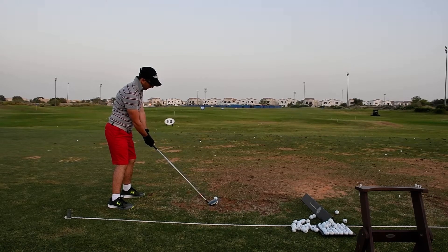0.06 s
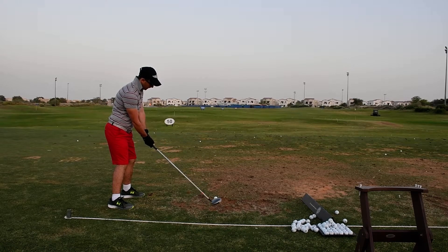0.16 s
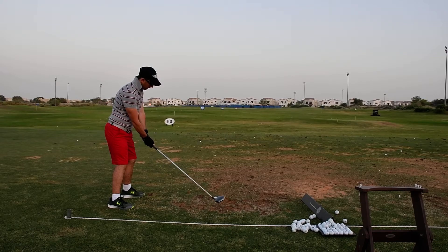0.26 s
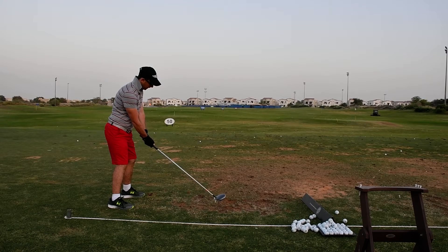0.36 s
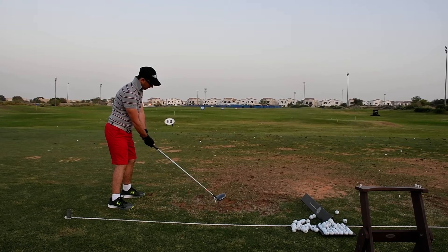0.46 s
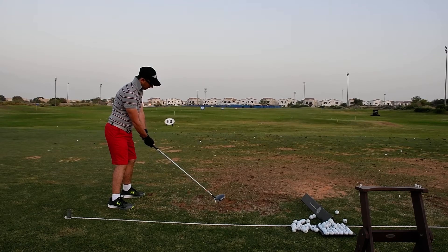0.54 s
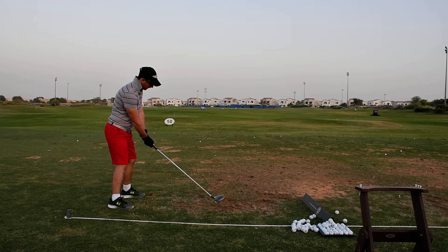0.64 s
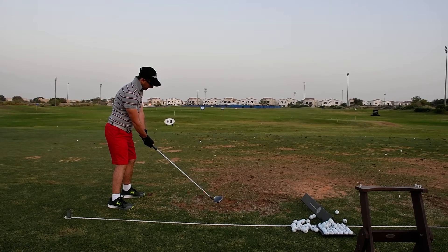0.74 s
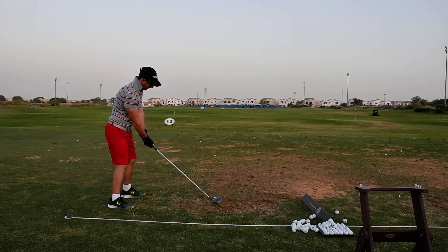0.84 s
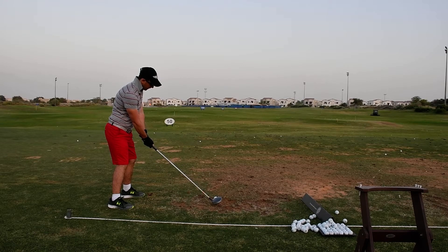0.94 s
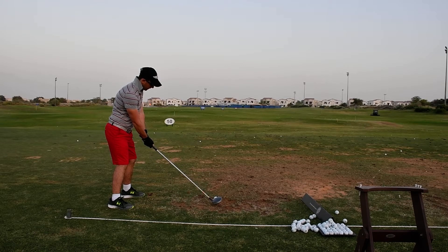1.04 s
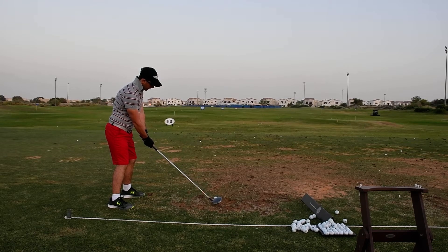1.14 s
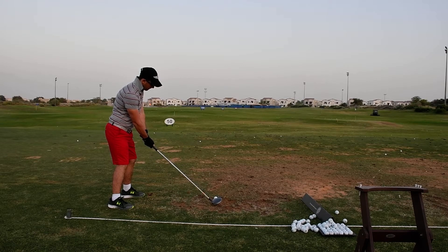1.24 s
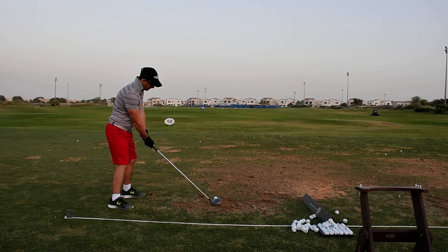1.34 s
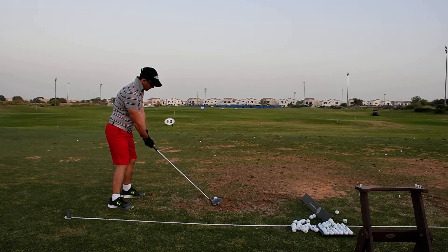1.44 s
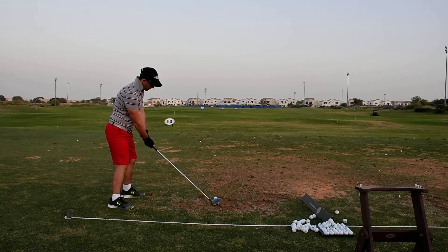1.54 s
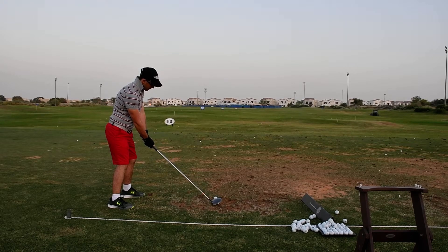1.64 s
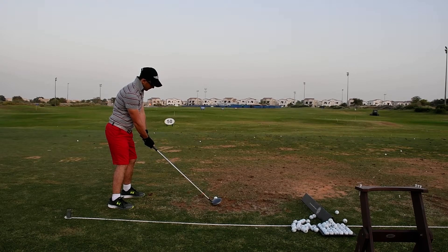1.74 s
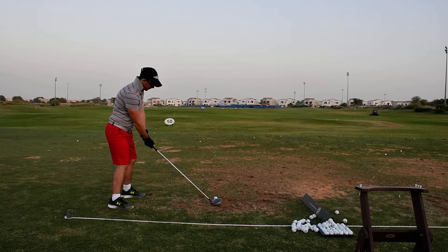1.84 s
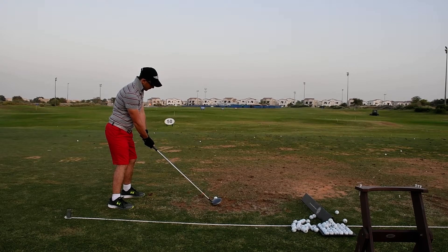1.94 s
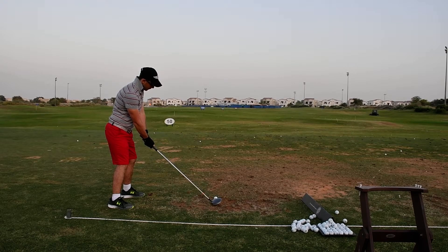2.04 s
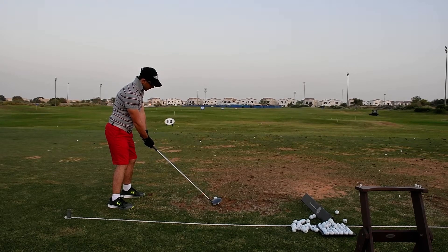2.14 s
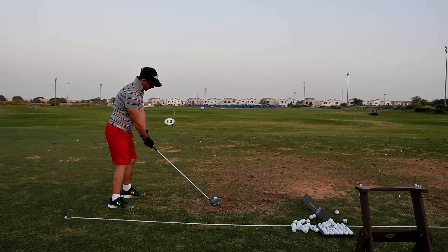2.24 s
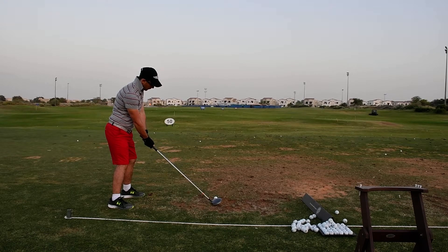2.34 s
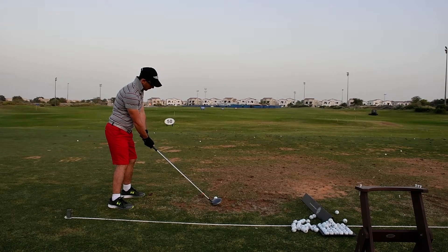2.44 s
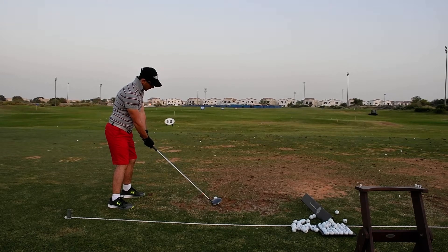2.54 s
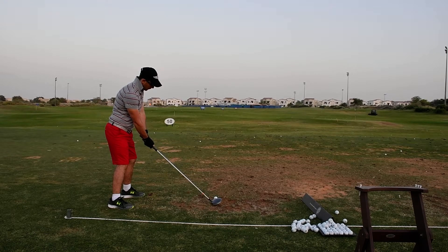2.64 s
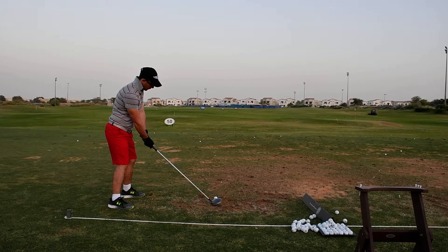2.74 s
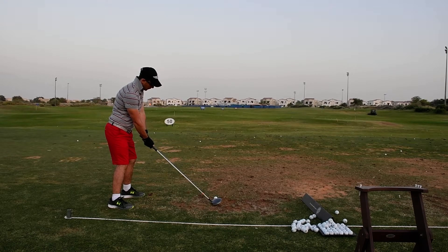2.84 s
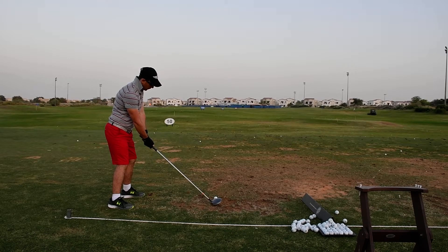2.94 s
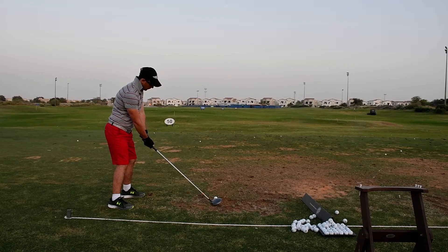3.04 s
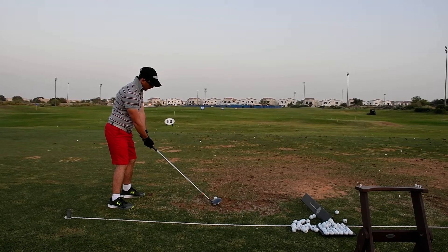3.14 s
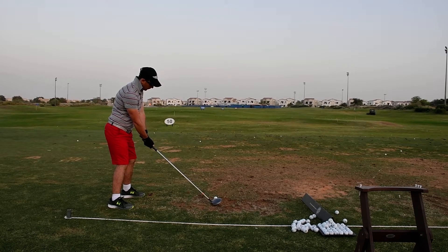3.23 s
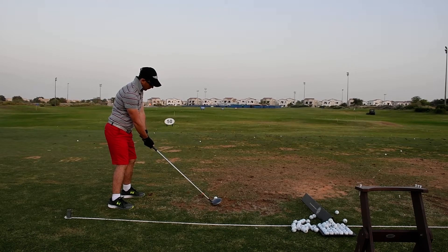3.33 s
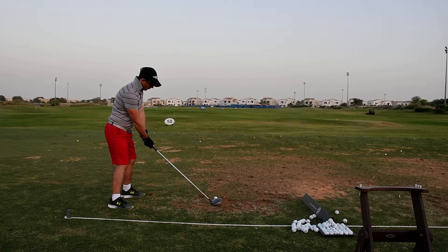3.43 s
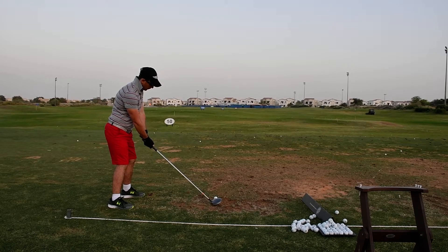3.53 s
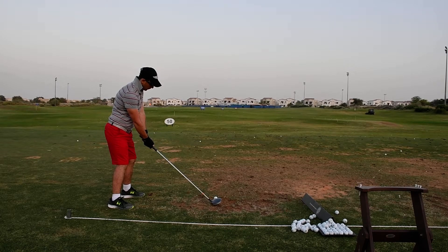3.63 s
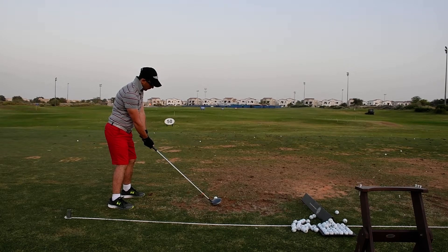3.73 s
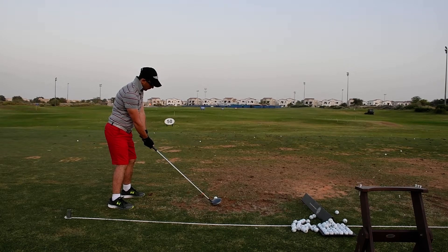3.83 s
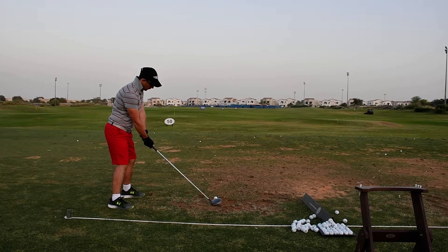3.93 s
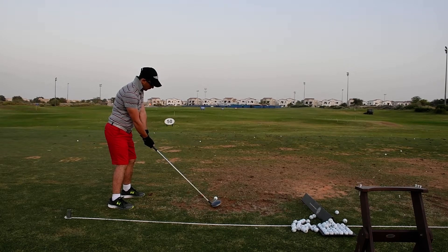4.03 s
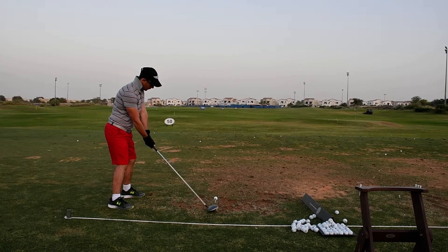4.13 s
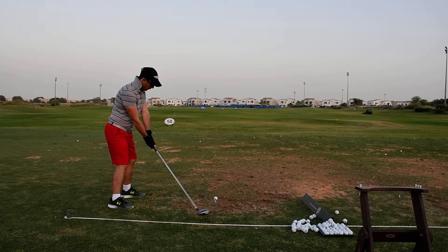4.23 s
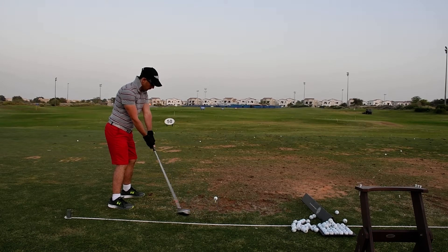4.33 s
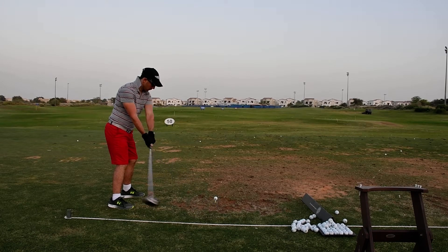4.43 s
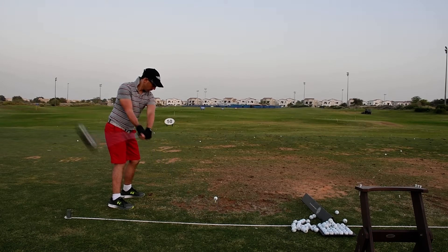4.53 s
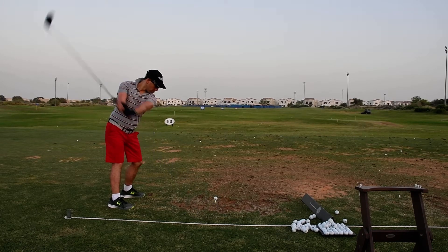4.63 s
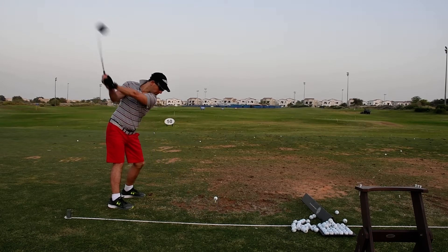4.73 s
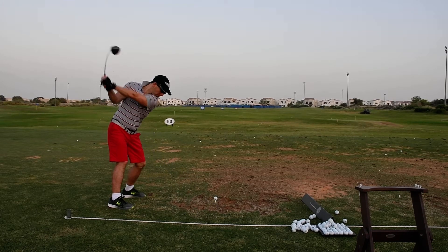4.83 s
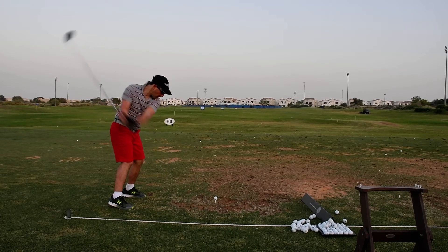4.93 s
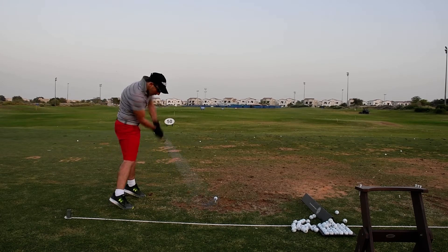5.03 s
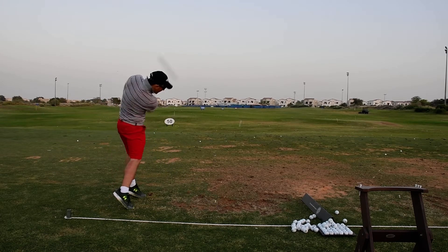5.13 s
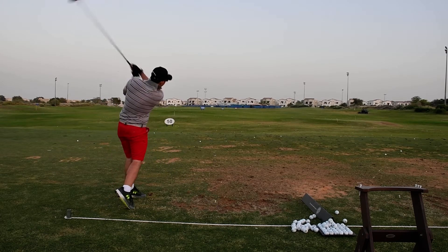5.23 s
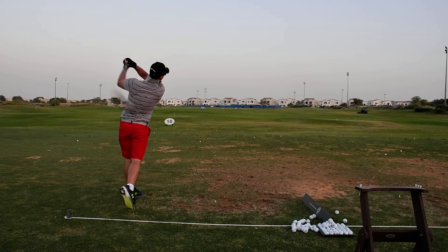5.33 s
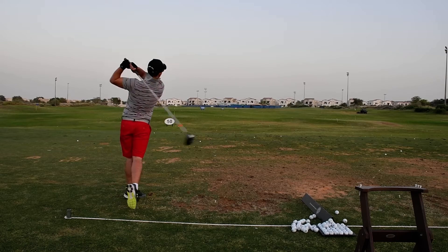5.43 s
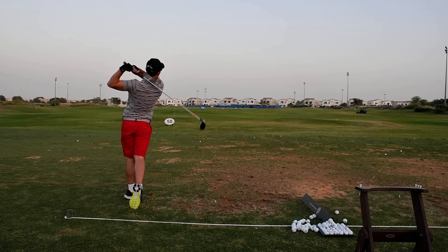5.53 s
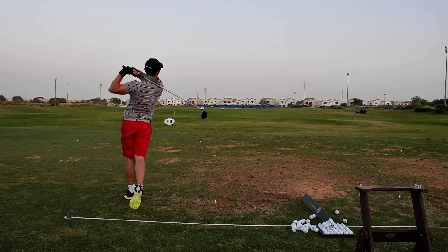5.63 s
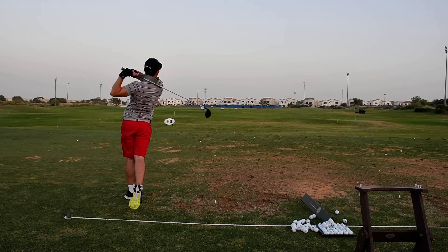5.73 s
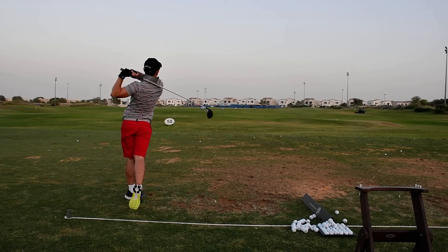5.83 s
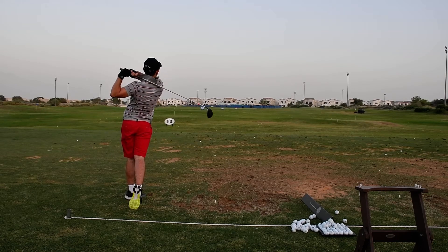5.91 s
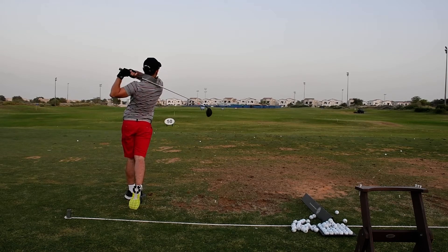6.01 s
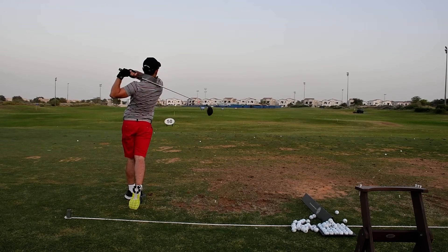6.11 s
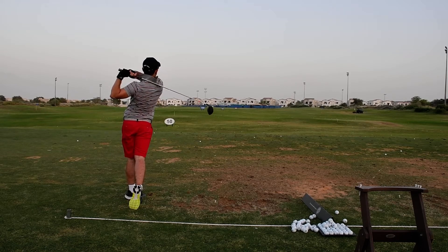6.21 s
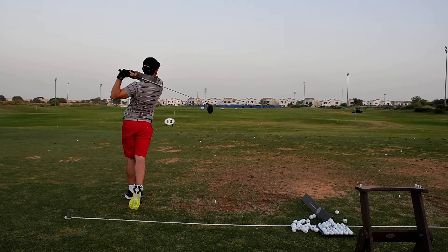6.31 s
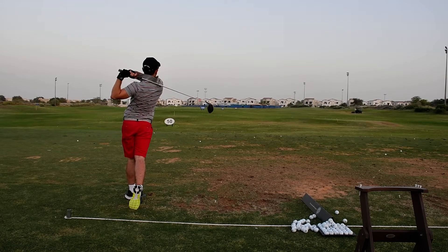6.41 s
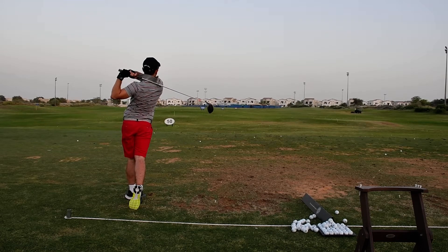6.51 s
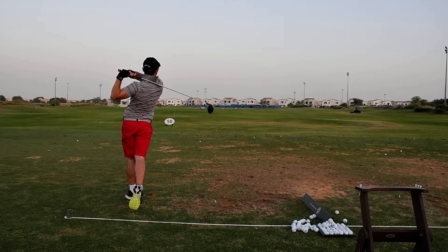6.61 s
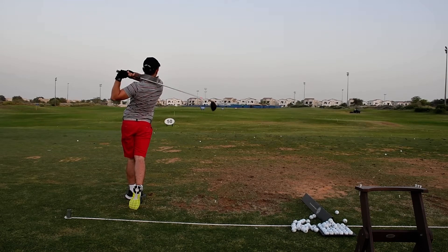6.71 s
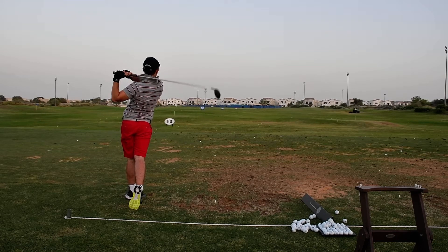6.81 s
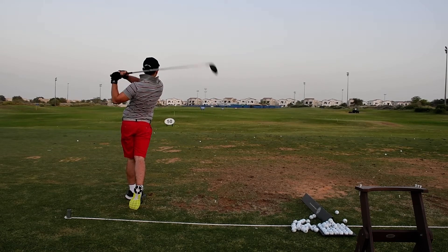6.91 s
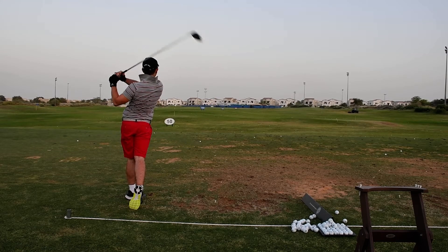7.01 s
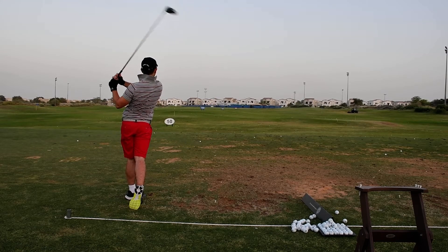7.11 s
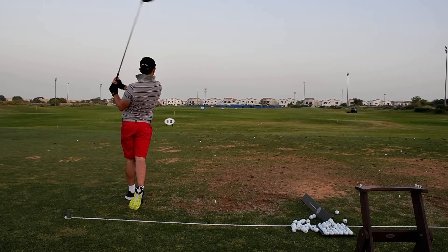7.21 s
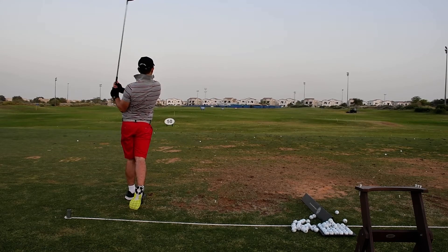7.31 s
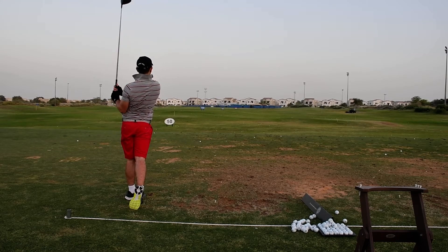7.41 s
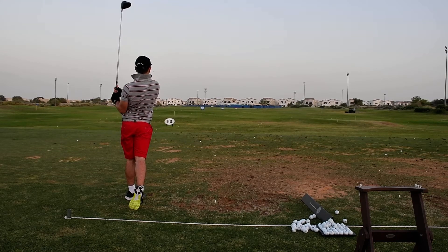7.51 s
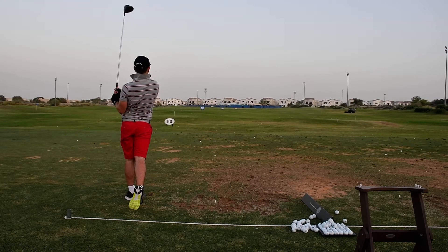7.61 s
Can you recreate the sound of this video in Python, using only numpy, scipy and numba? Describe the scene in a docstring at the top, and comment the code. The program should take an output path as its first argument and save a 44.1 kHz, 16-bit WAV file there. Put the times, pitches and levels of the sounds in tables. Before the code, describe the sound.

A golf driver cracks a ball with a loud, bright metallic ping on an open range, amid twittering birds, insect hiss and distant traffic.

```python
"""A golf drive on an open range.

The hollow club head is a sum of decaying modes that glide up by Doppler shift as it swings round;
a limiter and clipping flatten the crack. Two other shots to the right are knocks with ringing noise.
Birds are gliding tones, harmonics or narrow noise; insects are pulsing and steady bands of hiss.
Far traffic, open air and puffs of wind are shaped noise."""
import sys
import numpy as np
from scipy import signal
from scipy.fft import rfft, irfft
from scipy.io import wavfile
from numba import njit

SR = 44100
rng = np.random.default_rng(int(sys.argv[2]) if len(sys.argv) > 2 else 0)


def materialize(psi):
    """Save the field psi as 16-bit PCM at rate SR to the path in sys.argv[1].

    A 1-D psi becomes a single channel; in a 2-D psi each row is a channel.
    """
    bounded = np.clip(np.atleast_2d(psi).T, -1, 1)
    quanta = np.round(bounded * 32767).astype(np.int16)
    wavfile.write(sys.argv[1], SR, quanta)


N = 337806
T = np.arange(N) / SR  # time [s]
HZ = np.maximum(np.arange(N // 2 + 1) * SR / N, 1)  # frequency of each spectral bin [Hz]
SOUND_M_S = 343  # speed of sound [m/s]
IMPACT_S = 5.0415  # the club meets the ball [s]
TOP_HZ = 15700  # upper limit of the output band [Hz]

# Far traffic: (frequency [Hz], level density [dB per Hz])
TRAFFIC_SPECTRUM = [(20, -81), (40, -73.5), (65, -58), (105, -55.5), (170, -59), (260, -67), (400, -77),
                    (620, -71.5), (900, -66), (1300, -72.5), (2000, -82.5), (3200, -96), (8000, -112)]
# Open air, unrelated left and right: (frequency [Hz], level density [dB per Hz])
AIR_SPECTRUM = [(20, -78), (65, -64), (130, -64.5), (380, -85), (900, -74.5), (2000, -82), (3200, -84.5),
                (6200, -88.5), (7500, -100), (10000, -101), (12500, -103), (16000, -104)]
# Puffs of wind on the microphone: (time [s], half length [s], level [dB], top frequency [Hz])
WIND_PUFFS = [(0.029, 0.013, -27.5, 151), (0.102, 0.049, -28.5, 323), (0.192, 0.006, -27.5, 220),
              (.245, 0.019, -30, 151), (0.981, 0.017, -31.5, 352), (2.68, 0.043, -34, 171),
              (2.827, 0.048, -32.5, 154), (3.864, 0.046, -34, 169)]
# Swell of the insect chorus: (time [s], relative level [dB])
CHORUS_SWELL = [(0, -53.4), (0.5, -49), (1.1, -48.5), (1.45, -46.5), (2.15, -48.5), (2.55, -56),
                (2.85, -54.5), (3.2, -49.5), (3.75, -59), (4.35, -49.5), (4.78, -54), (5.55, -50.5),
                (5.95, -47), (6.27, -48), (6.65, -57.3), (7.1, -67), (7.66, -64)]
# Spectrum of the insect chorus: (frequency [Hz], relative level [dB])
CHORUS_SPECTRUM = [(2500, -45), (4500, -2), (6400, 3), (7300, -2), (8100, -2.5), (8800, -3.5), (9650, -4.5),
                   (10300, -9.5), (11500, -20), (14000, -31)]
# Lower insects without wing pulses: (time [s], level [dB])
DRONE_SWELL = [(0, -47.5), (.6, -53), (1.4, -62), (2.5, -50.5), (3.5, -55), (4.2, -50.5), (5.3, -48.5),
               (6.2, -45.5), (6.7, -68), (7.66, -61)]
# Mewing call of a far bird: (time [s], pitch [Hz], relative level [dB])
MEW_CONTOUR = [(.44, 440, -75), (.47, 465, -58), (.51, 530, -55), (.58, 600, -52), (.65, 643, -49),
               (.77, 681, -49), (.84, 630, -54), (.88, 600, -75)]
# Throat resonances of that call: (centre [Hz], width [Hz], relative level [dB])
THROAT_RESONANCES = [(1350, 300, 9), (2160, 370, 7.5), (2570, 200, -1), (4070, 460, -10)]
# Scolds of a hoarse bird: (time [s], length [s], centre [Hz], level [dB])
SCOLDS = [(4.39, 0.094, 2460, -39.5), (4.453, 0.078, 2320, -39.5), (4.553, .025, 2650, -43.5),
          (4.628, 0.093, 2330, -47.5), (4.767, 0.02, 2430, -46), (4.847, .05, 2350, -50)]
# Small bird's phrases, tumbling from a top pitch: (time [s], length [s], top pitch [Hz], relative level [dB])
BIRD_PHRASES = [(.42, .13, 5610, -47), (.633, .09, 4910, -49), (.82, .03, 4990, -51),
                (0.907, .04, 4550, -50), (1.011, .04, 4280, -53), (1.05, .13, 5670, -49),
                (1.53, .09, 5210, -48.5), (1.625, .04, 4390, -48), (1.72, .11, 4950, -47),
                (2.278, .04, 4300, -46), (2.324, .04, 4150, -47), (2.37, .03, 5000, -42),
                (2.44, .15, 5600, -48.5), (3.01, .08, 4870, -43), (3.1, .06, 5200, -44),
                (3.214, .04, 4480, -44.5), (3.738, .03, 5300, -49), (3.84, .09, 4900, -51.5),
                (4.047, .04, 3630, -49.5), (4.126, .06, 5120, -48.5), (4.28, .11, 5070, -45),
                (4.468, .03, 5050, -44), (4.595, .08, 4880, -46.5), (4.787, .04, 4900, -51),
                (4.873, .04, 4390, -48), (5.228, .11, 5600, -46.5), (5.325, .03, 5450, -48),
                (5.358, .04, 4450, -41.5), (5.552, .09, 4800, -48), (5.714, .1, 5080, -47.5),
                (5.9, .06, 5200, -49), (5.955, .1, 5000, -50), (6.165, .06, 4790, -48.5),
                (6.494, .11, 4900, -46), (6.657, .12, 5640, -44), (6.8, .03, 5020, -45),
                (6.866, .05, 3250, -48), (7.022, .05, 3750, -51), (7.336, .14, 5970, -47.5),
                (7.435, .09, 4970, -48)]
# Short low peeps between the phrases: (time [s], pitch [Hz], relative level [dB])
BIRD_PEEPS = [(1.34, 2665, -40.5), (1.826, 2520, -40), (2.848, 2900, -48), (6.13, 2510, -41),
              (6.325, 2730, -43), (7.535, 2540, -46)]
# Thin pips of another bird: (time [s], length [s], pitch [Hz], relative level [dB], final sag [Hz])
THIN_PIPS = [(3.293, .022, 5550, -48, 250), (3.515, .022, 5350, -46.5, 350),
             (3.625, .025, 5420, -43.5, 500), (4.68, .048, 6010, -45, 0), (4.959, .017, 5960, -45, 0),
             (5.387, 0.044, 5990, -39.5, 0)]
# Shots from other bays: (time [s], knock level [dB], knock frequency [Hz],
#                         ring level [dB], ring 60 dB decay time [s], tail level [dB])
BAY_SHOTS = [(2.2727, -5.5, 2150, -19, 0.027, -36), (4.4024, -14.5, 1900, -19, 0.039, -31)]
# Ring spectrum of those shots: (frequency [Hz], relative level [dB])
SHOT_SPECTRUM = [(1500, -12), (3000, -5), (5500, 4.5), (8000, 4.5), (11000, -2), (13000, -10), (16000, -20)]
# Main modes of the hollow club head: (frequency [Hz], relative level [dB], 60 dB decay time [s])
HEAD_MODES = [(1850, -25, .22), (2692, -18, .16), (2950, -10, .21), (3634, -9, .11), (4040, -13, .26),
              (4371, -14, .11), (5464, -3, .12), (5766, -2, .11), (5981, 5, .115), (6589, 4, .11),
              (6735, 0, .11), (7224, 0, .11), (7386, -5, .11), (7644, -7, .12), (7865, -5, .125),
              (8280, -6, .13), (8710, -9, .12), (8990, -9, .11), (9372, -12, .11), (9889, -11, .09),
              (11477, -16, .09)]
# Its dense weak overtones: (frequency [Hz], relative level of a mode [dB])
SHELL_SPECTRUM = [(2500, -19), (4500, -15), (6200, -6), (8000, -16), (10000, -9), (12500, -22),
                  (15500, -30)]
# Echoes off the range's fittings: (delay [s], relative level [dB], centre [Hz],
#                                   width of each of two resonances [Hz], left minus right [dB])
FITTING_ECHOES = [(0.019, -5.5, 2860, 900, 3), (0.029, -18, 6540, 2000, -6), (0.055, -29, 8800, 2500, -13),
                  (.083, -24.5, 8800, 1500, -12), (.099, -35, 9000, 1810, -10),
                  (0.107, -38, 6000, 700, -10)]

NOTE_S, NOTE_HZ = .034, 4505  # length of a note at the bird's easiest pitch; lower notes last longer
STEP_HZ = 789  # each note's top starts this far below the last
ARCH_HZ, ARCH_PER_HZ = 480, .6  # a note's ends lie this far below its top; higher notes arch more
SLUR_HZ = 130  # mean downward lean: the start is raised and the end lowered by this much
STRAIN_DB_PER_OCTAVE2 = 20  # notes weaken with the squared distance from the easiest pitch
PEEP_S, PEEP_SAG_HZ = .023, 220


def undb(db):
    """A level in decibels is twenty times the logarithm of the amplitude ratio returned here."""
    return 10 ** (np.asarray(db) / 20)


def unit(x):
    """Normalisation divides by the root mean square, leaving rms 1."""
    return x / np.sqrt(np.mean(x ** 2))


def colour(points, hz=HZ):
    """A spectrum is interpolated in decibels over log frequency and returned as gain."""
    point_hz, db = np.transpose(points)
    return undb(np.interp(np.log(hz), np.log(point_hz), db))


def resonance(centre_hz, width_hz, hz=HZ):
    """A damped oscillator passes a band around its natural frequency, with gain 1 at the centre."""
    return 1 / (1 + 1j * (hz ** 2 - centre_hz ** 2) / (hz * width_hz))


def shape(x, response):
    """Linear filtering is multiplication of spectra."""
    return irfft(rfft(x) * response, N)


def noise(response):
    """White noise is filtered to the given amplitude per root hertz."""
    return shape(rng.standard_normal(N), response) * np.sqrt(SR / 2)


def walk(rate):
    """Low-passed noise is a smooth random fluctuation: spread 1, up to about rate changes a second."""
    return unit(noise(1 / (1 + (HZ / rate) ** 4)))


def decay(age, t60):
    """Exponential damping loses 60 dB every t60 after silence before age 0."""
    return (age >= 0) * np.exp(-np.log(1000) * np.maximum(age, 0) / t60)


def place(x, lead_ms, pan_db):
    """Direction is a time and level difference: the left port leads by lead_ms and is pan_db louder."""
    late = np.exp(-2j * np.pi * HZ * lead_ms / 1000)
    left = x * undb(pan_db / 2)
    right = shape(x, late) * undb(-pan_db / 2)
    return np.array([left, right])


def scatter(x, wet_db, t60):
    """Diffuse reflection from turf and fittings is a decaying noise response, unrelated at each port."""
    tail = rng.standard_normal((2, N)) * decay(T - .003, t60)
    response = tail / np.sqrt(np.sum(tail ** 2) / 2)
    return undb(wet_db) * shape(x, rfft(response))


def haze():
    """Superposed broadband noise: fluctuating traffic with a faint engine drone, and steady open air."""
    traffic = noise(colour(TRAFFIC_SPECTRUM)) * undb(.5 * walk(2.0) + 0.75 * walk(7))
    engines = undb(-48.5) * unit(noise(resonance(104.65, 4.5) ** 2))
    air = np.array([noise(colour(AIR_SPECTRUM)) for _ in range(2)])
    return place(traffic + engines, lead_ms=0.21, pan_db=1) + air


def wind():
    """Wind pressure on the microphone is low-frequency noise in brief puffs, mostly on the left port."""
    puffs = np.zeros(N)
    for s, half_s, db, top_hz in WIND_PUFFS:
        swell = np.exp(-((T - s) / half_s) ** 2)
        puffs += undb(db) * swell * unit(noise(resonance(top_hz / 2, top_hz / 2) ** 3))
    return place(puffs, lead_ms=.2, pan_db=14.0)


def insects(chorus_db=-1.1, stroke_hz=20.5):
    """Amplitude modulation by wing strokes of three pulses roughens a high chorus over a lower band."""
    stroke = 2 * np.pi * np.cumsum(stroke_hz * (1 + 0.02 * walk(2.7))) / SR
    pulsing = 1 + .17 * np.cos(stroke) + .17 * np.cos(3 * stroke) + .08 * np.cos(4 * stroke)
    swell_db = np.interp(T, *np.transpose(CHORUS_SWELL)) + chorus_db + .5 * walk(30)
    chorus = pulsing * unit(noise(colour(CHORUS_SPECTRUM))) * undb(swell_db)
    drone_db = np.interp(T, *np.transpose(DRONE_SWELL))
    drone = unit(noise(resonance(6060, 1350) ** 2)) * undb(drone_db)
    direct = place(chorus, lead_ms=-0.093, pan_db=-10) + place(drone, lead_ms=-0.1, pan_db=-6.0)
    return direct + scatter(chorus + drone, wet_db=-18, t60=0.091)


def mewing_bird(count=7):
    """Source and filter: harmonics of a rising and falling pitch pass through fixed throat resonances."""
    s, pitch, db = np.transpose(MEW_CONTOUR)
    hz = np.interp(T, s, pitch) * (1 + 0.0035 * walk(57))
    phase = 2 * np.pi * np.cumsum(hz) / SR
    cry = np.zeros(N)
    for k in range(2, count):  # the fundamental is left out
        throat = sum(undb(gain_db) * np.abs(resonance(centre_hz, width_hz, k * hz)) ** 2
                     for centre_hz, width_hz, gain_db in THROAT_RESONANCES)
        cry += np.sin(k * phase) * throat
    cry = cry * np.interp(T, s, undb(db), left=0, right=0)
    return place(cry, lead_ms=-0.3, pan_db=10.5) + scatter(cry, wet_db=-6, t60=0.28)


def hoarse_bird():
    """Narrow-band noise in flat-topped bursts is heard as a rasping scold, far to the left."""
    scold = np.zeros(N)
    for s, length, hz, db in SCOLDS:
        burst = np.exp(-(2 * (T - s) / length - 1) ** 4)
        scold += undb(db) * burst * unit(noise(resonance(hz, 410) ** 3))
    return place(scold, lead_ms=0.11, pan_db=8.5) + scatter(scold, wet_db=-7, t60=0.43)


def whistles(notes, waver=0.013):
    """Frequency modulation: pure tones arch through three pitches with slight waver and flutter."""
    out = np.zeros(N)
    tremble = 1 + waver * walk(118)
    flutter = undb(2.6 * walk(117))
    for s, length, start_hz, middle_hz, end_hz, db in notes:
        i = np.flatnonzero(np.abs(T - s - length / 2) < .6 * length)
        u = (T[i] - s) / length
        arch = np.polyfit([0, .5, 1], [start_hz, middle_hz, end_hz], 2)
        hz = np.polyval(arch, u) * tremble[i]
        tone = np.sqrt(2) * np.sin(2 * np.pi * np.cumsum(hz) / SR)
        out[i] += undb(db) * signal.windows.tukey(len(i), .5) * flutter[i] * tone
    return out


def tumble(s, length, top_hz, db, skew_hz=110):
    """A phrase steps down in pitch; its arched notes grow longer and flatter until the time is used up."""
    notes, end = [], s + length
    for lean_hz in SLUR_HZ + skew_hz * rng.standard_normal(6):  # at most six notes
        note_s = NOTE_S * NOTE_HZ / top_hz
        if notes and s + note_s / 2 > end:
            break
        foot_hz = top_hz - max(ARCH_HZ + ARCH_PER_HZ * (top_hz - NOTE_HZ), 0)
        strain_db = STRAIN_DB_PER_OCTAVE2 * np.log2(top_hz / NOTE_HZ) ** 2
        notes.append((s, note_s, foot_hz + lean_hz, top_hz, foot_hz - lean_hz, db - strain_db))
        s, top_hz = s + note_s, top_hz - STEP_HZ
    return notes


def level_note(s, length, hz, db, sag_hz):
    """A note with equal first and middle pitch sags toward its end."""
    return s, length, hz, hz, hz - sag_hz, db


def flock(count=80, flock_db=-53.0, spread_db=3, low_hz=4500, high_hz=6000,
          early_s=.04, late_s=.1, length_s=.07):
    """Superposition of many weak voices: further birds join in around each phrase with short tumbles."""
    notes = []
    for k, (wait, pitch, loud) in enumerate(rng.random((count, 3))):
        phrase_s = BIRD_PHRASES[k % len(BIRD_PHRASES)][0]
        s = phrase_s - early_s + wait * (early_s + late_s)
        top_hz = low_hz + pitch * (high_hz - low_hz)
        notes += tumble(s, length_s, top_hz, flock_db + spread_db * (2 * loud - 1))
    return whistles(notes)


def small_birds():
    """Port differences separate a twittering bird and flock on the left from thin pips on the right."""
    notes = [note for phrase in BIRD_PHRASES for note in tumble(*phrase)]
    notes += [level_note(s, PEEP_S, hz, db, PEEP_SAG_HZ) for s, hz, db in BIRD_PEEPS]
    song, others = whistles(notes), flock()
    pips = whistles([level_note(*pip) for pip in THIN_PIPS], waver=.003)
    left = place(song, lead_ms=0.22, pan_db=5.5) + place(others, lead_ms=0.072, pan_db=2.5)
    right = place(pips, lead_ms=-0.252, pan_db=-11.5)
    return left + right + scatter(song + pips + others, wet_db=-6, t60=0.2)


def other_bays(echo_db=-8, echo_s=.025):
    """Impact excites resonance: each distant shot is a short knock, a bright metal ring and a thin echo."""
    shots = np.zeros(N)
    for s, knock_db, knock_hz, ring_db, t60, tail_db in BAY_SHOTS:
        age = T - s
        pulse = np.exp(-((age - .0005) / 0.00042) ** 2)
        knock = undb(knock_db) * np.sin(2 * np.pi * knock_hz * age) * pulse
        ring = undb(ring_db) * unit(noise(colour(SHOT_SPECTRUM))) * decay(age - .001, t60)
        # the late part has travelled further and lost its top
        tail = undb(tail_db) * unit(noise(resonance(7500, 5000) ** 3)) * decay(age - .004, .18)
        shots += knock + ring + tail
    delay = np.exp(-2j * np.pi * HZ * echo_s)
    echo = undb(echo_db) * shape(shots, resonance(7500, 1800) ** 2 * delay)
    return place(shots + echo, lead_ms=-0.19, pan_db=-8.5) + scatter(shots, wet_db=-16, t60=.04)


def swish(peak_s=5.022, rise_s=0.034, fall_s=0.044, head_db=-33, shaft_db=-32.5):
    """Flow noise grows with speed: the head whooshes and the thin shaft hisses at the bottom of the arc."""
    speed = np.exp(-np.abs(T - peak_s) / np.where(T < peak_s, rise_s, fall_s))  # 1 at the peak
    head = undb(head_db) * unit(noise(resonance(560, 450) ** 2))
    shaft = undb(shaft_db) * unit(noise(resonance(4700, 3000) ** 2))
    return place(np.sqrt(speed) * head + speed * shaft, 0, 0)


def head_ring(speed=32, angle=.5, turn_rate=13, ring_db=2, shell_db=-2.5, shell_t60=0.1,
              shade_db=-5, shade_hz=8500, count=150):
    """Doppler effect: decaying modes rise in pitch as the head flies away, then curves back.

    Units: speed [m/s], angle [rad], turn_rate [rad/s]."""
    age = T[:SR // 2]
    receding = speed * np.cos(np.minimum(angle + turn_rate * age, np.pi))
    # modal frequencies are those heard at impact, so the clock starts at normal rate
    clock = np.cumsum((SOUND_M_S + receding[0]) / (SOUND_M_S + receding)) / SR
    # the ring fades once the club passes behind the golfer's body
    in_view = 1 / (1 + (age / .13) ** 10)
    chance = rng.random((count, 3))
    fine_hz = 2500 + 13000 * (np.arange(count) + chance[:, 0]) / count
    fine_gain = undb(shell_db) * colour(SHELL_SPECTRUM, fine_hz) * (.5 + chance[:, 1])
    fine_t60 = shell_t60 * (0.6 + 0.69 * chance[:, 2])
    modes = [(hz, undb(db + ring_db), t60) for hz, db, t60 in HEAD_MODES]
    modes += zip(fine_hz, fine_gain, fine_t60)
    ring, start = np.zeros((2, N)), int(IMPACT_S * SR)
    for hz, gain, t60 in modes:
        # short waves reach the two ports with unlike phases
        unlike = min((hz / 8500) ** 3, 2) * rng.standard_normal((2, 1)) * .8
        phase = rng.uniform(0, 2 * np.pi) + unlike
        # the turf reflects each mode with another Doppler shift, so it beats
        beat = 1 + .4 * np.cos(2 * np.pi * .017 * hz * age + rng.uniform(0, 2 * np.pi))
        # the left port is shaded from the shortest waves
        ports = undb([[shade_db / (1 + (shade_hz / hz) ** 10)], [0]])
        tone = np.sin(2 * np.pi * hz * clock + phase)
        ring[:, start:start + len(age)] += gain * ports * beat * in_view * decay(age, t60) * tone
    return ring


def drive(contact_s=.00015, knock_db=20, level_db=-2):
    """Impulsive excitation: squeezing the ball gives one pressure swing, with the ring and its echoes."""
    squeeze = (T - IMPACT_S) / contact_s - 1
    knock = -squeeze * np.exp(-squeeze ** 2) * undb(knock_db)
    direct = head_ring() + knock
    mid = direct.mean(axis=0)
    echoes = np.zeros((2, N))
    for lag_s, db, hz, width_hz, pan_db in FITTING_ECHOES:
        delay = np.exp(-2j * np.pi * HZ * lag_s)
        echo = shape(mid, resonance(hz, width_hz) ** 2 * delay)
        echoes += undb(db) * place(echo, 0, pan_db)
    nearby = scatter(mid, wet_db=-8.5, t60=0.044)
    field = scatter(mid, wet_db=-30, t60=0.6)
    return undb(level_db) * (direct + echoes + nearby + field)


def scene(drive_db=-2):
    """Superposition: the pressures of all sources add at the two ports."""
    background = haze() + wind()
    wildlife = insects() + mewing_bird() + hoarse_bird() + small_birds()
    golf = other_bays() + swish() + undb(drive_db) * drive()
    return background + wildlife + golf


@njit
def follow(x, attack, release):
    """Envelope detection by one-pole smoothing that rises fast and sinks slowly."""
    out, level = np.empty(len(x)), 0.
    for i in range(len(x)):
        level += (x[i] - level) * (attack if x[i] > level else release)
        out[i] = level
    return out


def record(dry, ceiling=0.9, attack_s=0.00021, release_s=0.0051, port_db=1):
    """Nonlinear limiting and clipping flatten the crack; the right port resonates and the top is cut."""
    port_ring = undb(port_db) * shape(dry[1], resonance(9430, 1520))
    ports = np.array([dry[0], dry[1] + port_ring])
    peak = np.abs(ports).max(axis=0)
    envelope = follow(peak, min(1 / (attack_s * SR), 1.), 1 / (release_s * SR))
    limited = np.clip(ports * ceiling / np.maximum(envelope, ceiling), -1, 1)
    low_pass = signal.ellip(8, .2, 70, TOP_HZ, fs=SR, output="sos")
    return signal.sosfilt(low_pass, limited)


dry = scene()
out = record(dry)
materialize(out)
```